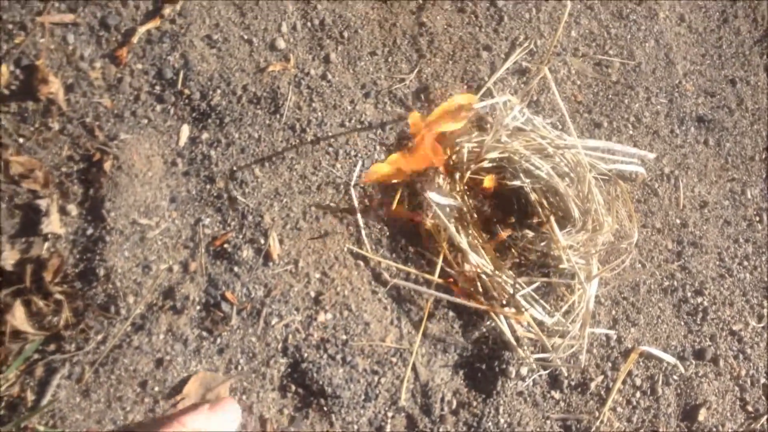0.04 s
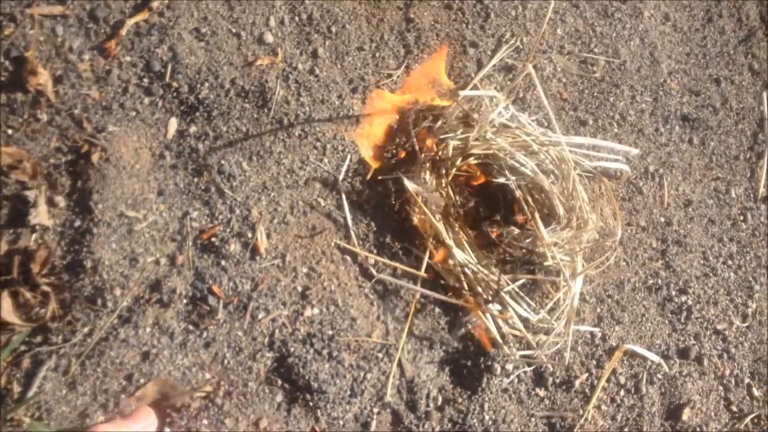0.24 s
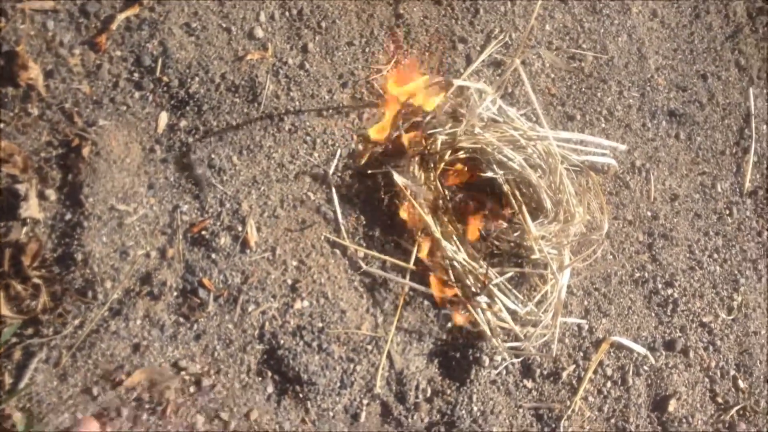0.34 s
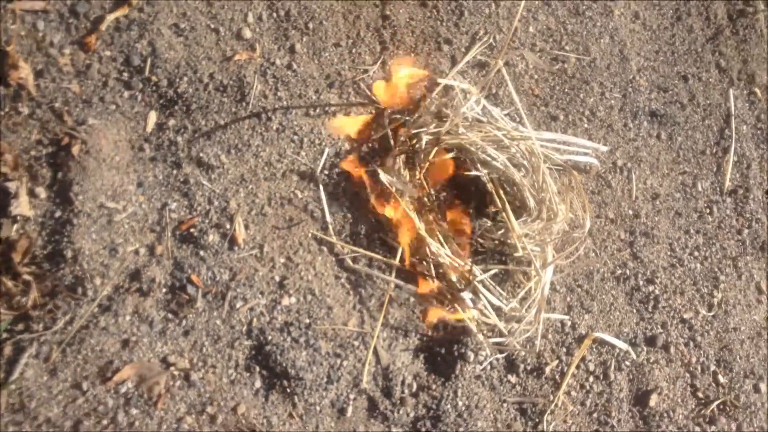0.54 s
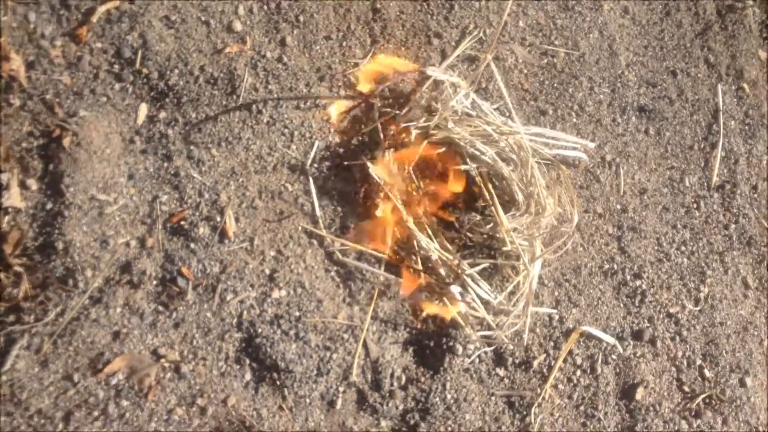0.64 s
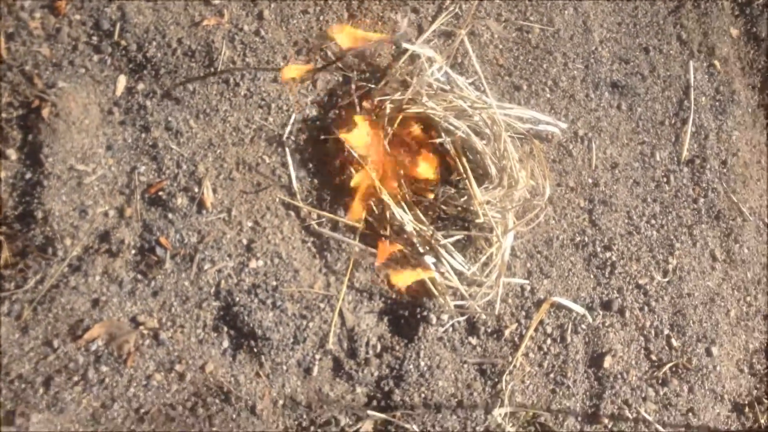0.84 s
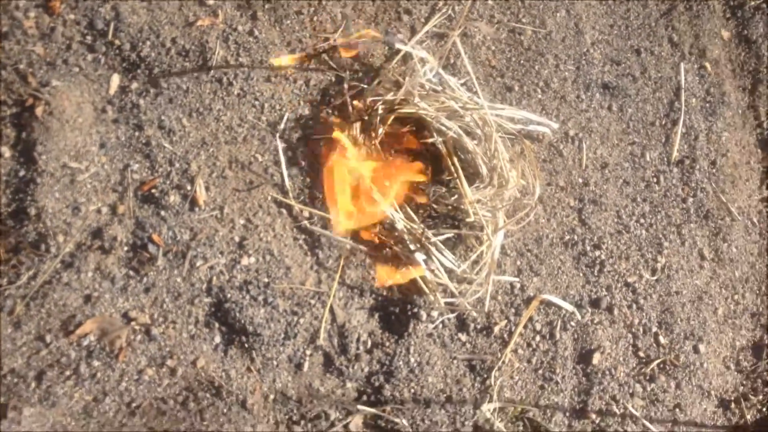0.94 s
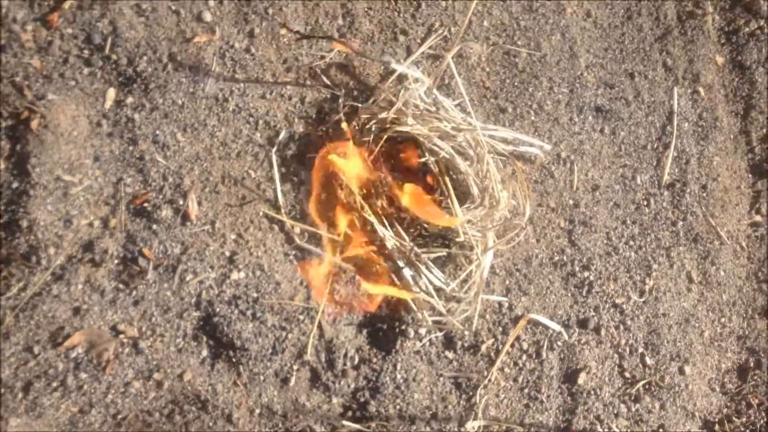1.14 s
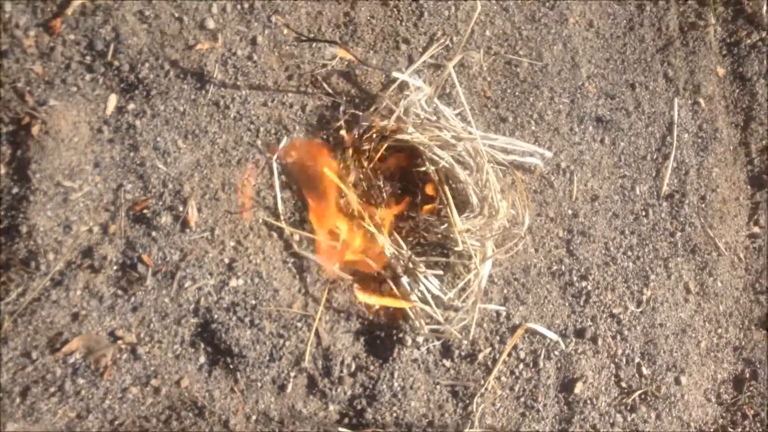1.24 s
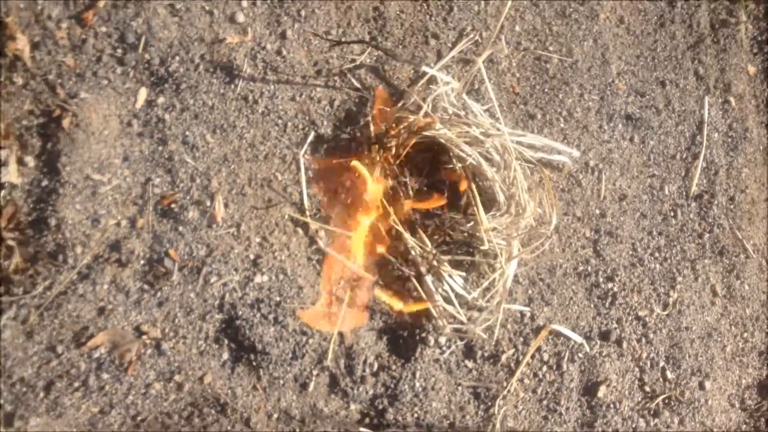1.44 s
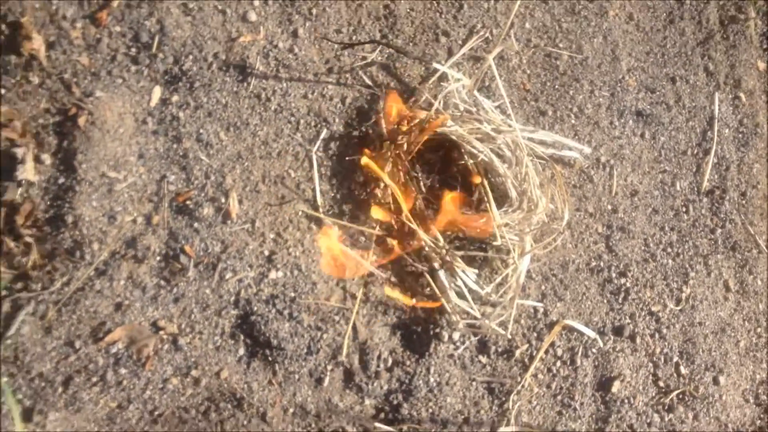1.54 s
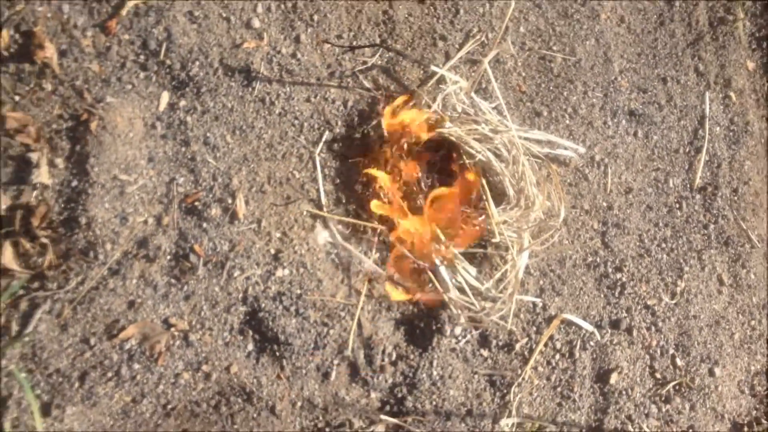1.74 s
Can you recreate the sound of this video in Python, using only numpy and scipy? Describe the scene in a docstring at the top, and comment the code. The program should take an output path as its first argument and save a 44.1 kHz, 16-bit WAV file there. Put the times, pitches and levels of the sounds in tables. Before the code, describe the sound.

Dry grass burns close by on bare ground outdoors. A few stalks snap over a soft hiss, the fire flares into a dense fizz, then sinks back into separate ticks and sharp snaps over a faint rumble of air.

```python
"""A nest of dry grass burns close by on bare ground, over the faint rumble of the open air.
First a few stalks snap and heated gas hisses out of them; it whistles briefly twice, and between the
whistles, at 0.5 s, comes one dull bump. A breathy jet tone rises, and near 1 s the fire flares into
a dense fizz. Then it sinks back into separate ticks and sharp snaps, the loudest at 1.4 s."""
import sys
import numpy as np
from scipy import signal
from scipy.fft import rfft, irfft
from scipy.io import wavfile

SR = 44100
rng = np.random.default_rng(int(sys.argv[2]) if len(sys.argv) > 2 else 0)


def file_out(sig):
    """Save sig as 16-bit WAV at sys.argv[1]."""
    # one column per channel
    cols = np.atleast_2d(sig).T
    # limit, then scale
    lim = np.clip(cols, -1, 1)
    pcm = np.round(lim * 32767).astype(np.int16)
    wavfile.write(sys.argv[1], SR, pcm)


N = 79380
EDGE_HZ = 15400  # top of the band


def amp(db):
    """The decibel law: 20 dB is a factor of ten in amplitude."""
    return 10 ** (np.asarray(db) / 20)


def unit_rms(x):
    """Normalisation to unit mean power."""
    return x / np.sqrt(np.mean(x ** 2) + 1e-20)


def curve(points, column=1):
    """Linear interpolation of a table over time."""
    p = np.array(points)
    return np.interp(np.arange(N) / SR, p[:, 0], p[:, column])


def coloured(x, colour):
    """Spectral shaping by (frequency, level) points, to unit rms."""
    hz, db = np.transpose(colour)
    gain = amp(np.interp(np.log(np.fft.rfftfreq(N, 1 / SR) + 1), np.log(hz), db))
    return unit_rms(irfft(rfft(x) * gain, N))


def wander(rate_hz):
    """Random modulation: band-limited noise of unit rms."""
    hz = np.fft.rfftfreq(N, 1 / SR)
    white = rfft(rng.standard_normal(N))
    return unit_rms(irfft(white * (hz > rate_hz / 10) / (1 + (hz / rate_hz) ** 2), N))


def resonate(x, hz, width_hz):
    """Forced response of a damped resonator tuned to the curve hz."""
    turn = np.exp(2j * np.pi * np.cumsum(hz) / SR)
    pole = np.exp(-np.pi * width_hz / SR)
    return 2 * (turn * signal.lfilter([1 - pole], [1, -pole], x / turn)).real


def add(mix, s, sound):
    """Superposition of a sound from time s on."""
    part = mix[round(s * SR):][:len(sound)]
    part += sound[:len(part)]


def bursts(per_s, spread_db, decay_s, steady_share):
    """Shot noise: random decaying puffs add in power to steady noise."""
    size = amp(spread_db * np.minimum(rng.exponential(1, N), 3.2))
    puffs = size * (rng.random(N) < per_s / SR)
    power = signal.lfilter([1], [1, -np.exp(-1 / (decay_s * SR))], puffs ** 2)
    return np.sqrt(steady_share + (1 - steady_share) * power / power.mean()) * rng.standard_normal(N)


def ring(hz, decay_s):
    """Damped free vibration of a hollow stalk, of unit energy."""
    t = np.arange(512) / SR
    tone = np.sin(2 * np.pi * hz * t) * np.exp(-t / decay_s) * (1 - np.exp(-2 * t / decay_s))
    return tone / np.linalg.norm(tone)


# Spectrum of the open air (frequency [Hz], relative level [dB])
AIR_SPECTRUM = [(25, -16), (55, -20.5), (100, -6.5), (140, 0.5), (200, 1), (320, -4), (500, -6), (850, -6),
                (1400, -12), (2500, -15.5), (6000, -18.5), (15000, -21.5)]
# Its envelope (time [s], level [dB])
AIR_ENVELOPE = [(.15, -65), (.25, -62.5), (.9, -62), (1.2, -63.5), (1.55, -66.5), (1.76, -64)]
def air():
    """Turbulence of breeze and flame makes a faint, uneven rumble."""
    rumble = coloured(rng.standard_normal(N), AIR_SPECTRUM)
    return rumble * amp(curve(AIR_ENVELOPE) + 1.5 * wander(rate_hz=43))


# Modes of the bump (frequency [Hz], level [dB], rise time [s], decay time [s])
BUMP_MODES = [(220, -44.5, 0.0027, 0.0013), (700, -37.5, 0.0015, 0.0012), (1400, -50, 0.0012, 0.0008)]
def bump(onset_s=.5083):
    """Modal response to a soft knock: heavily damped modes, neighbours in antiphase."""
    out, t = np.zeros(N), np.arange(SR // 20) / SR
    for k, (hz, db, rise_s, decay_s) in enumerate(BUMP_MODES, 1):
        swell = t ** (rise_s / decay_s) * np.exp(-t / decay_s)
        add(out, onset_s, (-1) ** k * amp(db) * swell / swell.max() * np.sin(2 * np.pi * hz * t))
    return out


# Glide of the gas jet (time [s], resonance [Hz], level [dB])
JET_GLIDE = [(0, 700, -90), (.3, 769.5, -72.5), (.55, 801, -74), (.62, 951.4, -63.5), (.7, 1021, -65.5),
             (.78, 1151, -61), (.85, 1410, -66.5), (.94, 1814, -59.5), (1.03, 1579, -68.5),
             (1.17, 1050, -68), (1.28, 1674, -70), (1.36, 1207, -81)]
def jet(relative_width=.9):
    """Turbulence in a resonance of constant Q: a breathy tone that widens as it climbs."""
    cycles = np.cumsum(curve(JET_GLIDE)) / SR
    eddies = rng.standard_normal(N) + 1j * rng.standard_normal(N)
    flutter = np.interp(cycles * relative_width, np.arange(N), eddies)
    tone = (flutter * np.exp(2j * np.pi * cycles)).real
    return unit_rms(tone) * amp(curve(JET_GLIDE, column=2) + 2 * wander(rate_hz=90))


# Spits of gas (time [s], duration [s], pitch [Hz], level [dB])
GAS_SPITS = [(0.39, 0.048, 4100, -63), (0.603, 0.028, 4540, -58.5)]
def spits():
    """Flow noise drives a narrow resonance: gas whistles through a split stalk."""
    out = np.zeros(N)
    for s, length_s, hz, db in GAS_SPITS:
        tone = unit_rms(resonate(rng.standard_normal(N), np.full(N, hz), width_hz=480))
        swell = signal.windows.tukey(round(length_s * SR))
        add(out, s, amp(db) * swell * tone[:len(swell)])
    return out


# Spectrum of escaping gas (frequency [Hz], relative level [dB])
HISS_SPECTRUM = [(300, -22), (1000, -4), (2100, -1.5), (2900, 1), (3600, 1), (4500, 3.5), (5200, -0.5),
                 (6300, 2.5), (7900, 3), (10000, -2.5), (15000, -1.5)]
# Its envelope (time [s], level [dB])
HISS_ENVELOPE = [(0, -80), (.11, -65.5), (.135, -60), (.175, -60.5), (.21, -56), (.38, -55), (.41, -52),
                 (.45, -53), (.54, -55.7), (.79, -54), (.83, -50.5), (1.0, -51), (1.2, -57.5), (1.5, -69.5),
                 (1.8, -82)]
def hiss():
    """Flow noise: gas leaves the heated stalks in a grainy, wavering hiss."""
    gas = bursts(per_s=500, spread_db=4.5, decay_s=.0009, steady_share=0.7)
    return coloured(gas, HISS_SPECTRUM) * amp(curve(HISS_ENVELOPE) + 1.17 * wander(rate_hz=33))


# Spectrum of fine blades catching fire (frequency [Hz], relative level [dB])
FIZZ_SPECTRUM = [(400, -45), (1200, -19), (2400, -14), (3400, -3.5), (4000, -19), (5000, -3.5), (5600, -9),
                 (6500, -3), (8200, 1.5), (10000, -1), (12500, -5), (15000, -6)]
# Its envelope (time [s], level [dB])
FIZZ_ENVELOPE = [(0, -100), (.79, -67), (.82, -56), (.91, -54.5), (.97, -44), (1.01, -43), (1.07, -44.5),
                 (1.13, -43.5), (1.19, -47.5), (1.225, -55), (1.257, -47.5), (1.275, -54), (1.3, -49.5),
                 (1.33, -54), (1.43, -52), (1.5, -58), (1.52, -78), (1.542, -59), (1.6, -69.5), (1.8, -72)]
def fizz():
    """Dense shot noise: the pops of countless fine blades merge as the fire flares."""
    pops = bursts(per_s=1400, spread_db=6.5, decay_s=0.0009, steady_share=0.45)
    return coloured(pops, FIZZ_SPECTRUM) * amp(curve(FIZZ_ENVELOPE) + 0.5 * wander(rate_hz=89))


# Envelope of the ticking (time [s], level [dB])
TICK_ENVELOPE = [(0, -86), (.45, -68), (.75, -65.5), (1.0, -51), (1.22, -61.5), (1.36, -54), (1.49, -60.5),
                 (1.57, -68), (1.62, -71)]
def ticks(stalks=32, per_s=800, low_hz=3960, high_hz=12440, spread_db=4):
    """A Poisson process of impulses rings thin stalks, each at its natural frequency."""
    out = np.zeros(N)
    for hz in np.geomspace(low_hz, high_hz, stalks):
        size = amp(spread_db * np.minimum(rng.exponential(1, N), 3))
        impulses = size * (rng.random(N) < per_s / stalks / SR)
        out += signal.oaconvolve(impulses, ring(hz, decay_s=0.0003))[:N]
    return unit_rms(out) * amp(curve(TICK_ENVELOPE))


def crack(centre_hz, octaves=0.38, body_db=-13.5, body_hz=11300, bass_lag_s=0.00061, size=512):
    """Dispersion along a stalk smears a click of unit energy: its bass trails its treble."""
    hz = abs(np.fft.fftfreq(size, 1 / SR)) + 1
    hump = np.exp(-(np.log2(hz / centre_hz) / octaves / 2) ** 2)
    body = amp(body_db) * hz / (hz + centre_hz / 10) / (1 + (hz / body_hz) ** 2)
    spectrum = np.exp(np.conj(signal.hilbert(np.log(hump + body))))[:size // 2 + 1]  # minimum phase
    delay_s = bass_lag_s * np.maximum(1 - hz[:len(spectrum)] / EDGE_HZ, 0)
    click = irfft(spectrum * np.exp(-2j * np.pi * np.cumsum(delay_s) * SR / size))
    return click / np.linalg.norm(click)


# Bursting stalks, and at 0.509 s the sharp onset of the bump (time [s], level [dB], click centre [Hz], # ring
# pitch [Hz], ring level [dB re click], sputter level [dB re impulse])
STALK_SNAPS = [(0.0747, -37.5, 6850, 3200, -12, -10), (0.12, -37.5, 9300, 7300, -19, -11),
               (0.1973, -33.5, 8140, 9660, -1, -4), (0.4776, -32, 7000, 8000, 2.5, -10),
               (0.509, -32, 3200, 3240, -19, -3.5), (0.566, -31, 6000, 2000, -7, -10),
               (0.659, -31.5, 4230, 1700, -6, -11), (0.835, -25, 9300, 8700, 2, -12),
               (0.9599, -27, 9500, 7700, -5, -8), (0.9732, -23, 10300, 1900, -11, -4),
               (0.984, -26, 11500, 11000, -8, -12), (1.009, -21.5, 7950, 3530, -6, -2),
               (1.088, -35, 1703, 8900, 2, 0), (1.1275, -23.5, 9200, 8900, -9, 3),
               (1.183, -28, 8600, 4000, -12, -5), (1.1994, -24, 9000, 8000, -10, -6),
               (1.2578, -28.5, 8050, 1897, -9.5, 1), (1.2974, -27, 7900, 2000, -9.5, -1.5),
               (1.391, -12, 10600, 8100, -3.5, -11.5), (1.3914, -32.5, 2420, 1400, -10, -4),
               (1.4025, -26.5, 11000, 6010, 0, -5), (1.4171, -19.5, 11800, 5900, -0.5, -7),
               (1.4257, -28.5, 8650, 9500, 0, -7), (1.4592, -24.5, 8000, 3100, -10, -8),
               (1.4795, -26.5, 9200, 10400, -6, -6), (1.5022, -24, 9200, 3450, -5, -8),
               (1.5083, -35, 5500, 4500, 0.5, -9), (1.514, -41, 6000, 4860, 4.5, -11),
               (1.5308, -35, 5000, 9050, -2, -7), (1.536, -29.5, 10490, 8800, -1.5, -4),
               (1.5477, -33.5, 7740, 6200, -5, -7), (1.602, -33.5, 6400, 4720, -6, 0.5),
               (1.681, -35.5, 11500, 10700, -5, 2), (1.6824, -45, 2615, 5530, -6, 5.5),
               (1.7211, -32.5, 8800, 9400, 2.5, -13), (1.7526, -38, 11100, 14000, 0, -5.5)]
def snaps(sputter_s=0.0021, sputter_delay_s=.0002, scatter_s=0.01, scatter_db=-19):
    """Convolution: a stalk's click and ring follow its burst, its sputter and a faint ground echo."""
    out, t = np.zeros(N), np.arange(SR // 25) / SR
    for s, db, centre_hz, ring_hz, ring_db, sputter_db in STALK_SNAPS:
        grain, roughness, echo = rng.standard_normal((3, len(t)))
        sputter = grain * np.exp(np.clip(roughness, -2, 2) - t / sputter_s) * (t > sputter_delay_s)
        scatter = echo * np.exp(-t / scatter_s)
        tail = amp(sputter_db) * unit_rms(sputter) + amp(scatter_db) * unit_rms(scatter)
        drive = (t == 0) + tail / np.sqrt(len(t))
        response = crack(centre_hz) + amp(ring_db) * ring(ring_hz, decay_s=0.00057)
        add(out, s, amp(db) * signal.fftconvolve(drive, response))
    return out


def scene():
    """Superposition of the open air, the bump and the fire in one channel."""
    return (air() + bump() + jet() + spits() + hiss() + fizz() + ticks() + snaps())[None]


def record(dry):
    """Band limiting: a gentle low cut at 88 Hz and a steep edge in the treble."""
    thin = signal.lfilter(*signal.butter(1, 88, "highpass", fs=SR), dry)
    lowpass = signal.firwin(401, EDGE_HZ, window=("kaiser", 7), fs=SR)
    return signal.oaconvolve(thin, lowpass[None], "same")


dry = scene()
out = record(dry)
file_out(out)
```